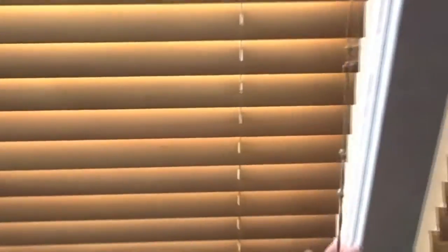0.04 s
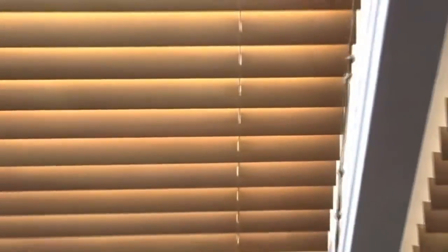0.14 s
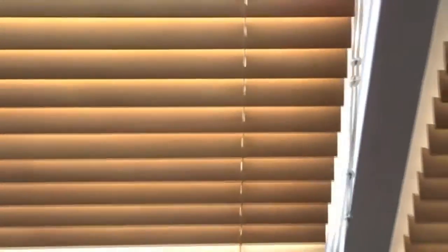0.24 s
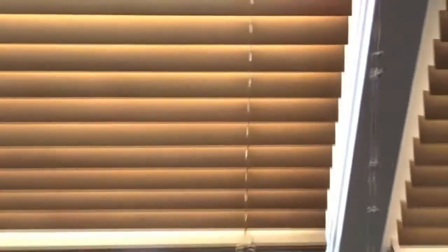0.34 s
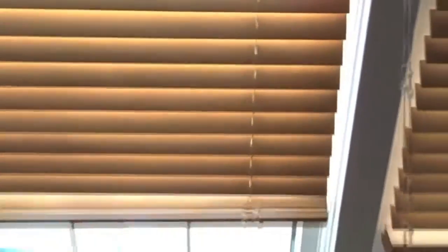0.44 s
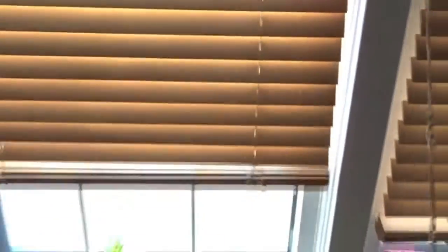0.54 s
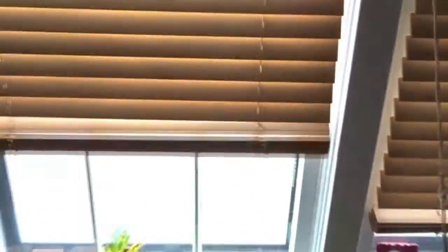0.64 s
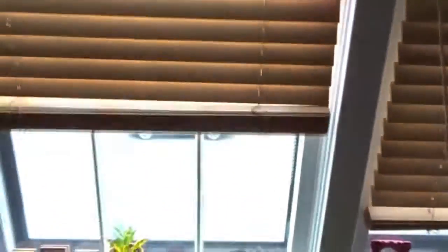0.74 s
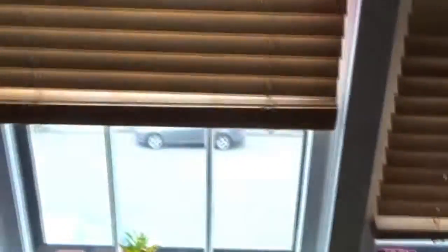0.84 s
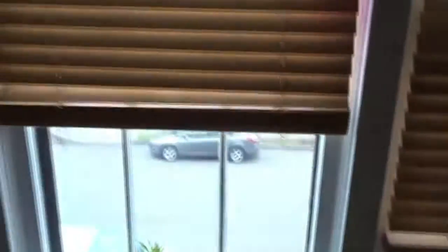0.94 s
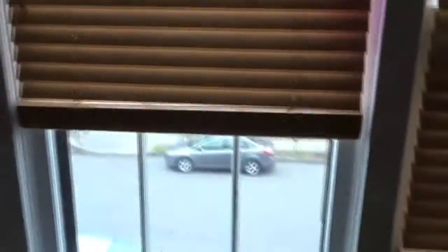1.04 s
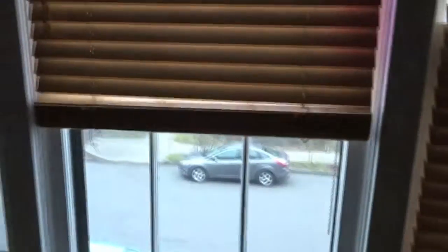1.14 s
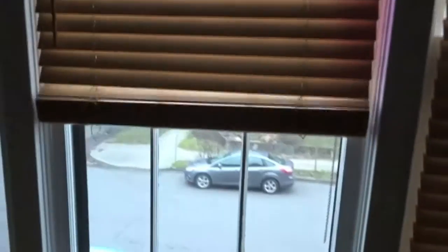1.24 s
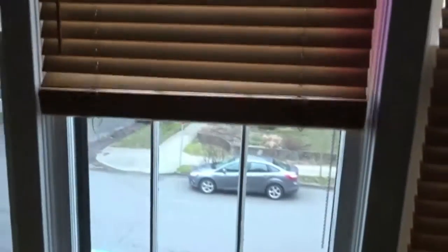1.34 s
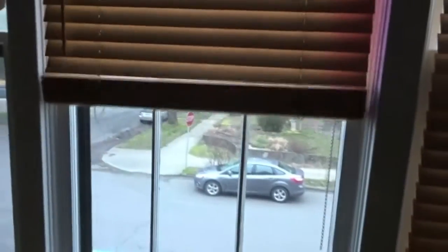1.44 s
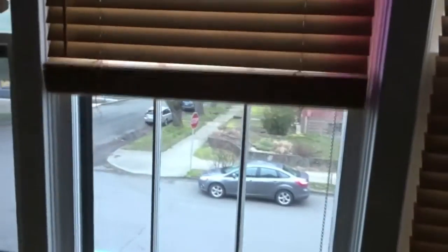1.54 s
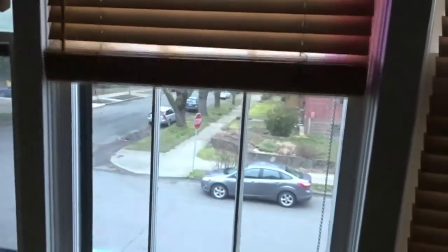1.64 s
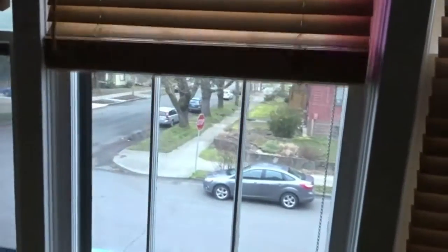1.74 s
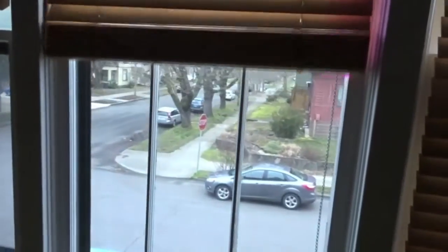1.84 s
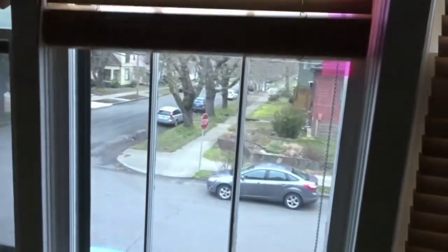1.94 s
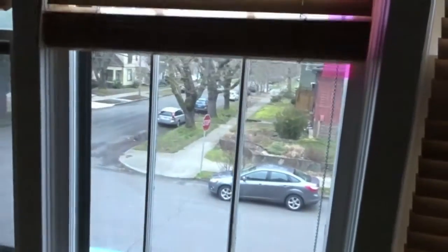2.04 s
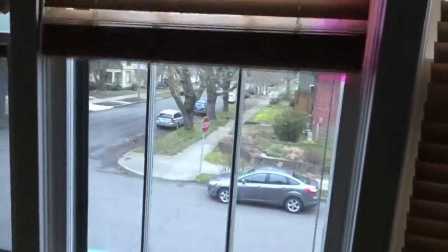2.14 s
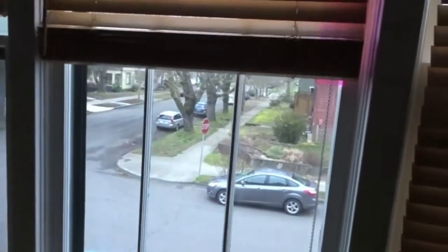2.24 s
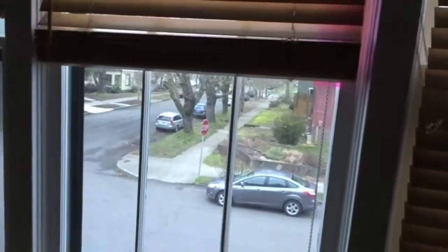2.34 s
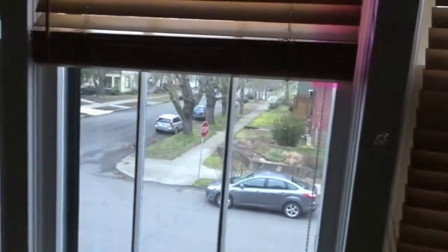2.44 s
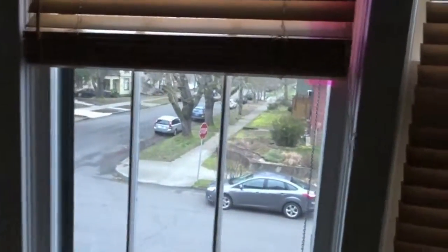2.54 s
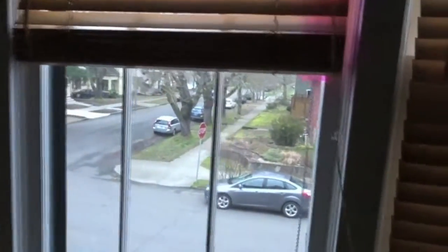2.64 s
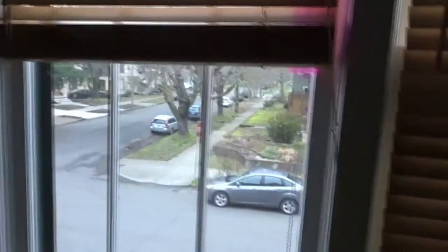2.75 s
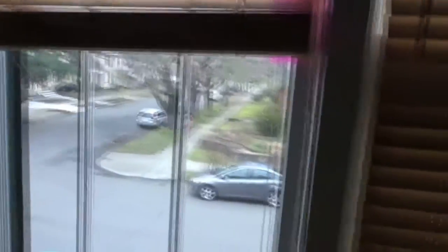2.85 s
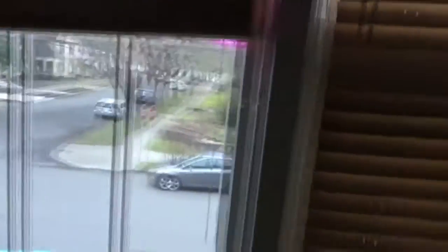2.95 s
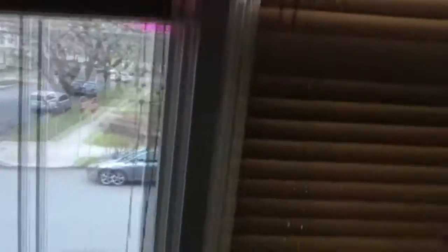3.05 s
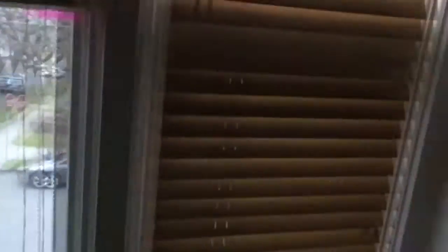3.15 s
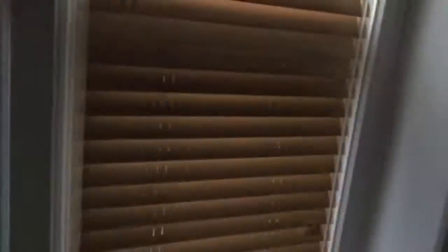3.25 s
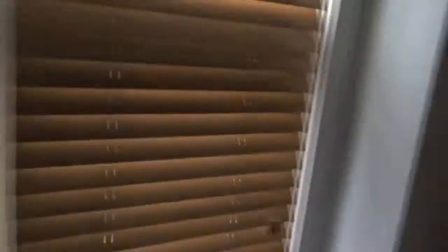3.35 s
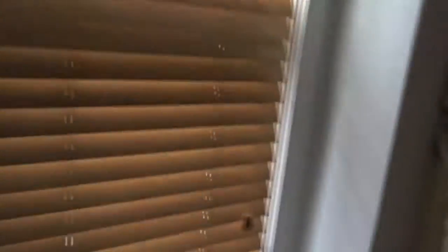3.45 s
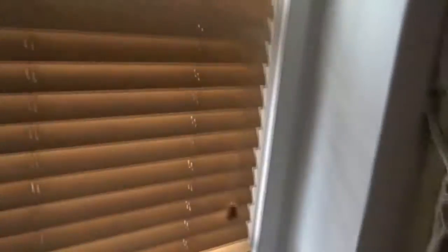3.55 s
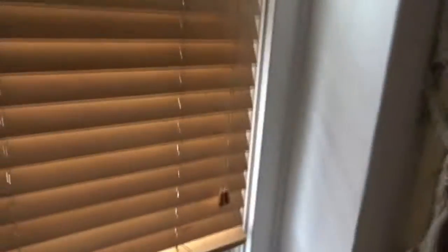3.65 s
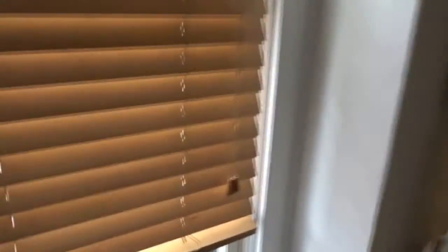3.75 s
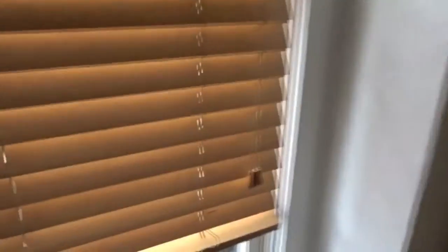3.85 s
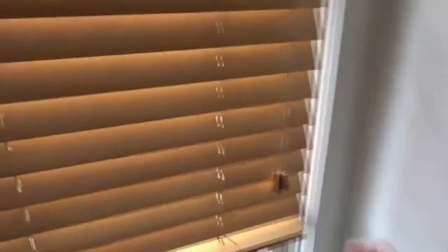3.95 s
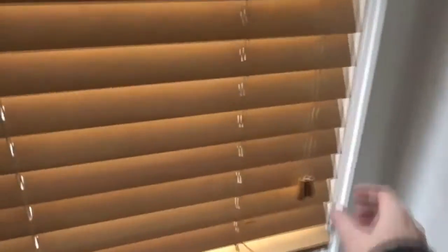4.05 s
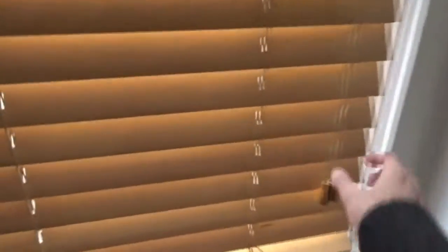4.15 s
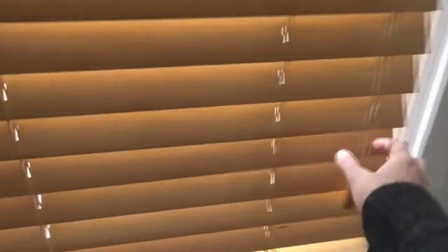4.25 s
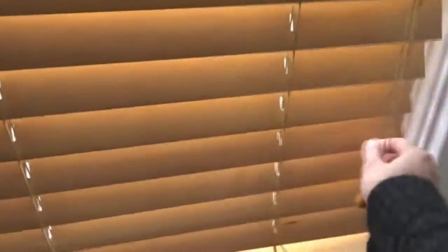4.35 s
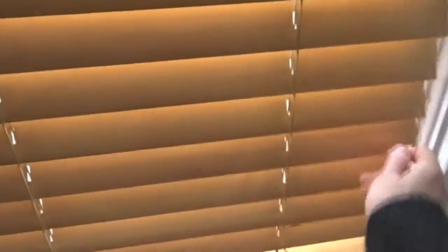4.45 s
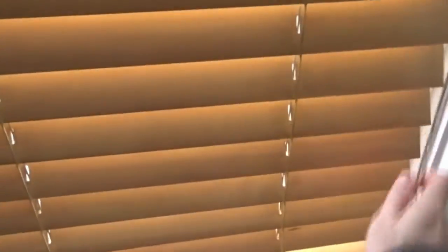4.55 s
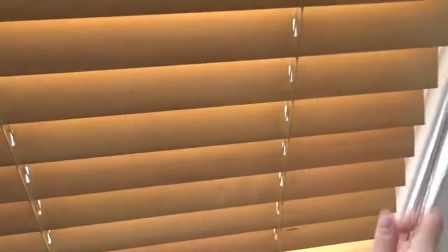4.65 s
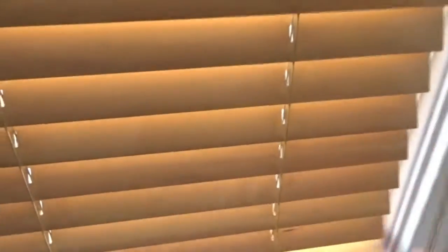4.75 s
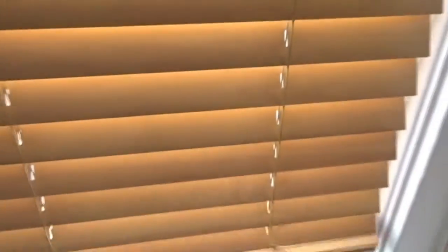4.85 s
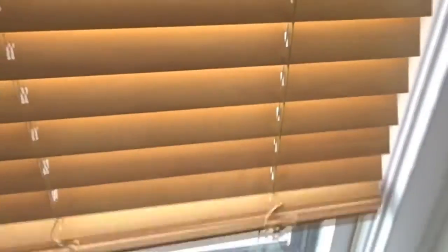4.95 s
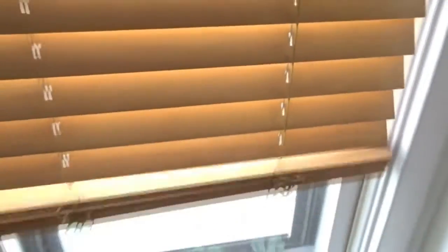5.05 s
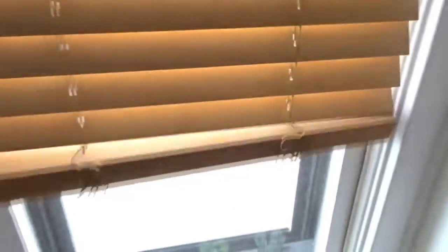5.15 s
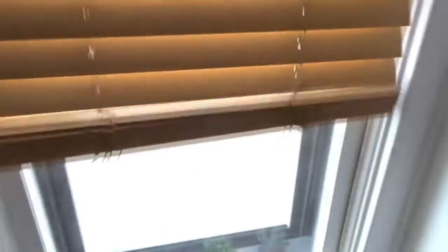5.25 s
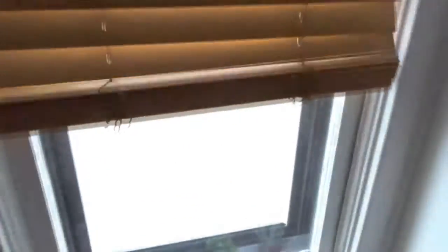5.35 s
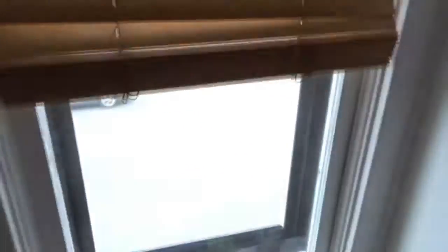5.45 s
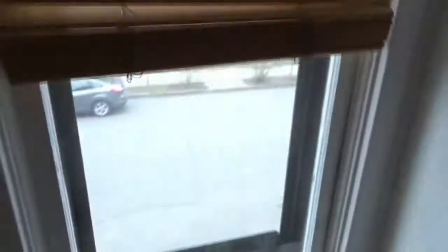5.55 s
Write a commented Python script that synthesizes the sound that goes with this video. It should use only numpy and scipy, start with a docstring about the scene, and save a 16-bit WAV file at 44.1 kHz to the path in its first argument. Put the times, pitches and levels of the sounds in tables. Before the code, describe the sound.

A wooden venetian blind is hauled up in a clattering rush, a cord lock snaps, a hand bumps the frame, and a second blind rattles up.

```python
"""In a bare room, a wooden venetian blind is hauled up: the cord rubs and creaks through the head rail,
while the rising bottom rail gathers slat after slat, each with a clack and a chatter.
Then the raised stack knocks, cords tap, a low hum comes and goes, and the cord lock snaps.
Fingers slide along the next cord, a hand bumps the window frame, tassels click, and a second blind goes up.
Shaped noise makes the rubbing, bursts of tiny impacts the clacks, and fading sine waves the ringing."""
import sys
import numpy as np
from scipy import signal
from scipy.fft import rfft, irfft, next_fast_len
from scipy.io import wavfile
from scipy.ndimage import map_coordinates

SR = 44100
rng = np.random.default_rng(int(sys.argv[2]) if len(sys.argv) > 2 else 0)


def persist_wave(psi):
    """Save psi, clipped to +-1, as 16-bit WAV."""
    counts = np.round(np.clip(psi, -1, 1) * 32767).astype(np.int16)
    wavfile.write(sys.argv[1], SR, np.atleast_2d(counts).T)


N = 246959  # length [samples]
T = np.arange(SR // 2) / SR  # half a second of sample times [s]

# Levels in the tables are relative: the functions that play them may add a gain of their own.
# Two-row signals hold mid (what both ears share) and side (what differs between them).


def amp(db):
    """Decibels to gain."""
    return 10 ** (np.asarray(db) / 20)


def unit(x):
    """Scale to rms 1."""
    return x / np.sqrt(np.mean(x ** 2) + 1e-20)


def blow(x):
    """Scale a hit to rms 1 over its first 10 ms."""
    start = x[..., :SR // 100]
    return x / np.sqrt(np.mean(start ** 2, axis=-1, keepdims=True) + 1e-20)


def noise():
    """Independent white noise for mid and side, as long as the scene."""
    return rng.standard_normal((2, N))


def add(track, s, x):
    """Mix x into the track at time s, cutting off what runs past the end."""
    part = track[:, round(s * SR):][:, :x.shape[-1]]
    part += x[..., :part.shape[1]]


def along(points, hz):
    """Read a (frequency, value) table at any frequency, on a log axis."""
    f, v = np.transpose(points)
    return np.interp(np.log(hz + 1), np.log(f + 1), v)


def effort_gain(rows):
    """Gain at every sample from (time, level) rows, silent outside them."""
    s, db = np.transpose(rows)
    return amp(np.interp(np.arange(N) / SR, s, db, left=-np.inf, right=-np.inf))


def swells(rows, attack, release):
    """Gain of (start, length, level) gestures: each rises, holds, then dies away; times in seconds."""
    t = np.arange(N) / SR
    total = np.zeros(N)
    for s, length, db in rows:
        rise = np.clip((t - s) / attack, 0, 1)
        fall = np.exp(-np.maximum(t - s - length, 0) / release)
        total += amp(db) * rise * fall
    return total


def wobble(rate):
    """A smooth random curve with this many random points a second."""
    knots = rng.standard_normal(int(N * rate / SR) + 4)
    return map_coordinates(knots, [np.arange(N) * rate / SR])


def fade(t60):
    """A decay that loses 60 dB in t60 seconds."""
    return np.exp(-np.log(1000) * T / t60)


def colour(x, spectrum):
    """Filter x to the given spectrum without any sound before its start."""
    m = 2 * next_fast_len(x.shape[-1] // 2 + 2048)
    # folding the cepstrum forward in time makes the filter minimum-phase
    cepstrum = irfft(np.log(amp(along(spectrum, np.fft.rfftfreq(m, 1 / SR)))))
    cepstrum[1:m // 2] *= 2
    cepstrum[m // 2 + 1:] = 0
    return irfft(rfft(x, m) * np.exp(rfft(cepstrum)), m)[..., :x.shape[-1]]


def resonate(x, hz, q):
    """Let through one narrow resonance; a higher q is narrower."""
    return signal.lfilter(*signal.iirpeak(hz, q, fs=SR), x)


def grains(rate, spread_db, t60):
    """A random crowd of tiny contacts, rate a second and uneven in size, rms 1."""
    sizes = amp(spread_db * np.clip(rng.standard_normal(N), -2, 2))
    strikes = (rng.random(N) < rate / SR) * sizes
    energy = np.abs(signal.fftconvolve(strikes ** 2, fade(t60) ** 2)[:N])
    return unit(np.sqrt(energy) * noise())


def crack(t60, scatter_db, scatter_t60):
    """Mid and side of a short contact, with its scatter off slats, glass and frame."""
    decay = fade(t60) + amp(scatter_db) * fade(scatter_t60)
    return rng.standard_normal((2, len(T))) * decay


# how long the room rings: (frequency [Hz], time to fall 60 dB [s])
ROOM_DECAY = [(150, 0.48), (400, 0.53), (1000, 0.62), (3000, 0.51), (7000, 0.49), (15000, 0.41)]


def fade_by_band(hz, t, build):
    """Wall echoes build up, then each frequency dies at its own speed."""
    decay = np.exp(-np.log(1000) * t / along(ROOM_DECAY, hz)[:, None])
    return decay * (1 - np.exp(-t / build))


def reverb(x, build=0.00061):
    """The room's tail: it swells at a pace of build seconds, and its pattern is new every quarter second."""
    out, hop = np.zeros((2, N)), SR // 4
    for start in range(0, N, hop):
        piece = x[:, start:start + hop]
        if np.abs(piece).max() > 1e-5:  # skip silence
            hz, t, z = signal.stft(rng.standard_normal((2, SR // 2)), SR, nperseg=256)
            tail = signal.istft(z * fade_by_band(hz, t, build), SR, nperseg=256)[1]
            tail = tail / np.linalg.norm(tail[0])
            add(out, start / SR, signal.fftconvolve(piece, tail, axes=1))
    return out


def room(x, wet_db):
    """Direct sound plus the room's tail."""
    return x + amp(wet_db) * reverb(x)


# spectrum of the quiet room: (frequency [Hz], level [dB])
ROOM_TONE_COLOUR = [(20, -6), (65, -7.5), (90, -14.5), (138, -2.5), (165, -4.5), (290, -3.5), (360, -0.5),
                    (470, -4.5), (950, -14), (1400, -19.5), (2500, -26), (4500, -30), (13500, -39),
                    (16000, -57)]
ROOM_TONE_DB = -53.5


def room_tone():
    """The nearly steady hush of the room: coloured noise with a very slight wavering of level."""
    level = amp(ROOM_TONE_DB + 0.288 * wobble(32))
    return level * unit(colour(noise(), ROOM_TONE_COLOUR))


# effort of each pull on the cord, one curve a pull: (time [s], level [dB])
PULL_EFFORTS = [
    [(.15, -48), (.3, -31), (.41, -29.5), (.46, -6.5), (.52, -1), (.6, 4), (.72, 3), (.88, -2.5),
     (.97, -8.5), (1.1, -9.5)],
    [(1.1, -12), (1.22, -10.5), (1.6, -12), (1.69, -5), (1.94, -8), (2.04, -36), (2.12, -26.5), (2.22, -18),
     (2.31, -66)],
    [(4.79, -39.5), (4.86, -14.5), (4.9, -9), (5.03, -4), (5.14, -5), (5.3, -6), (5.39, -5.5), (5.44, -6),
     (5.6, -1)],
]
# what each pull stirs at full effort, one row a pull:
# (slat chatter [dB], cord rasp [dB], slat sliding [dB], head rail ringing [dB])
PULL_MIX = [(-33, -36, -33, -40.5), (-30, -35, -27, -35.5), (-33, -32, -28, -57)]
# spectra of chattering slats, rasping cord and sliding slats: (frequency [Hz], level [dB])
CHATTER_COLOUR = [(150, -30), (450, -6.5), (700, -29.5), (1150, -1), (2100, 2), (2650, -4), (2930, 0.5),
                  (3200, -1), (4200, -2.5), (6000, -19), (16000, -23.5)]
CORD_COLOUR = [(1500, -21.5), (3500, 2), (5500, 4.5), (8000, 0), (11000, -1.5), (14000, -7.5),
               (16000, -46.5)]
SLIDE_COLOUR = [(180, -24), (450, -14.5), (620, -5), (880, 1), (1050, -5), (1350, -6.5), (2600, -10.5),
                (8000, -39)]
# resonances of the head rail under the running cord: (frequency [Hz], width [Hz], level [dB])
HEAD_RAIL = [(1700, 100, -7), (2900, 140, 2.5), (5060, 150, -6)]


def pulls():
    """Hanging slats chatter and slide while the cord rasps through holes and pulleys and rings the head rail."""
    mixes = [np.outer(amp(mix), effort_gain(rows)) for rows, mix in zip(PULL_EFFORTS, PULL_MIX)]
    shake, rub, slip, roll = sum(mixes)
    touches = grains(rate=150, spread_db=5, t60=.016)
    fibres = grains(rate=600, spread_db=3.5, t60=.01)
    slips = grains(rate=220, spread_db=3, t60=.035)
    chatter = shake * unit(colour(touches, CHATTER_COLOUR))
    cord = rub * unit(colour(fibres, CORD_COLOUR))
    sliding = slip * unit(colour(slips, SLIDE_COLOUR))
    rail = sum(amp(db) * resonate(fibres, hz, hz / width) for hz, width, db in HEAD_RAIL)
    return chatter + cord + sliding + roll * unit(rail)


# lesser slats jostle: contacts a second, level at full effort, its spread, spread of edge-on lean
JOSTLE_PER_S, JOSTLE_DB, JOSTLE_SPREAD_DB, JOSTLE_EDGE_DB = 26, -36, 2, 3
# their middle flexing pitch, middle clack pitch, and length [s]
JOSTLE_HZ, JOSTLE_RING_HZ, JOSTLE_S = 860, 3000, 0.0057


def jostles():
    """Lesser slat landings at random moments of the pulls, louder where the effort is greater."""
    effort = sum(effort_gain(rows) for rows in PULL_EFFORTS)
    starts = np.flatnonzero((rng.random(N) < JOSTLE_PER_S / SR) & (effort > 0))
    rows = []
    for i, (a, b, c) in zip(starts, rng.standard_normal((len(starts), 3))):
        db = JOSTLE_DB + 20 * np.log10(effort[i]) + JOSTLE_SPREAD_DB * a
        pitch_hz, ring_hz = JOSTLE_HZ * np.exp(0.071 * c), JOSTLE_RING_HZ * np.exp(0.33 * c)
        rows.append((i / SR, db, JOSTLE_EDGE_DB * b, pitch_hz, ring_hz, JOSTLE_S))
    return rows


OWN_COLOUR_DB = 3.5  # how far one slat's resonances stand out from another's


def own_colour(count):
    """Random peaks and dips across the spectrum: no two slats ring alike."""
    heights = OWN_COLOUR_DB * np.clip(rng.standard_normal(count), -2, 2)
    return np.column_stack([np.geomspace(1000, 16000, count), heights])


# spectra of a flexing slat (for a pitch of 800 Hz) and of its clack (for a ring of 3000 Hz):
# (frequency [Hz], level [dB])
FLEX_COLOUR = [(100, -44.5), (200, -21), (380, -15.5), (490, -15), (640, 2), (800, 7), (1080, -4.5),
               (2100, -1), (3000, 1), (4100, -5), (6000, -28.5), (11500, -28), (16000, -43)]
CLACK_COLOUR = [(200, -20.5), (800, 3), (1200, -2.5), (2100, -.5), (2650, 2.5), (3000, 7), (3400, -1),
                (4500, -8), (6500, -13), (16000, -38)]
FLEX_DB, SNAP_DB = -3, -5.5  # flexing and edge snap beside the clack of an even landing
MICRO_IMPACTS_PER_S = 9000
# a corner strikes first, with the energy of this many seconds of the burst that follows
FIRST_TOUCH_S = .0006


def contact(clack_db, edge_db, pitch_hz, ring_hz, length, rise, scatter_db):
    """One wooden contact: a corner ticks, then the edge meets its neighbour in a burst of micro-impacts."""
    flex_db = clack_db + FLEX_DB - edge_db
    snap_db = clack_db + SNAP_DB + edge_db
    t = T[:SR // 8]
    # nearby slats and glass scatter a short tail after the burst
    tail = amp(scatter_db) * fade(9 * length + .02)[:len(t)]
    touch = (1 - np.exp(-t / rise)) * (np.exp(-(t / length) ** 2) + tail)
    moments = unit(rng.random(len(t)) < MICRO_IMPACTS_PER_S / SR)
    impacts = touch * rng.standard_normal((2, len(t))) * moments
    impacts[:, 0] += np.sqrt(FIRST_TOUCH_S * SR) * np.array([1, rng.uniform(-1, 1)])
    hit = colour(impacts, own_colour(count=48))

    # a flat landing flexes the slat; its pitch and its ring depend on where it is struck
    flexing = colour(hit, [(hz * pitch_hz / 800, db) for hz, db in FLEX_COLOUR])
    clack = colour(hit, [(hz * ring_hz / 3000, db) for hz, db in CLACK_COLOUR])
    # the more edge-on the contact, the higher its snap reaches
    top_db = np.clip(-15.5 + 1.4 * (snap_db - clack_db), -20, 0)
    edge = colour(hit, [(5000, 0), (15000, top_db)])

    parts = [(flex_db, flexing, 1.5 * pitch_hz, "low"),
             (clack_db, clack, (1200, 5000), "band"),
             (snap_db, edge, 5000, "high")]
    total = 0
    for db, x, hz, kind in parts:
        band = signal.butter(3, hz, kind, fs=SR, output="sos")
        total = total + amp(db) * blow(signal.sosfilt(band, x))
    return total


# a slat lands on the stack: (time [s], level [dB], edge-on rather than flat [dB],
# flexing pitch [Hz], ring of the clack [Hz], length [s])
SLAT_LANDINGS = [(0.3424, -42.5, -5.5, 774, 2300, 0.021), (0.4691, -26.5, -1, 860, 2670, 0.013),
                 (0.5031, -15.5, -2, 870, 3170, 0.0079), (0.51, -18.5, -5, 850, 3000, 0.0046),
                 (0.536, -28, 0, 850, 3050, 0.0093), (0.5803, -17.5, -2.5, 850, 3000, 0.012),
                 (0.632, -25, -11.5, 766, 2970, 0.0025), (0.6446, -18.5, 7.5, 790, 3200, 0.025),
                 (0.682, -22.5, 6, 790, 3000, 0.017), (0.696, -18, -7.5, 804, 2850, 0.0061),
                 (0.709, -17, -7, 780, 2840, 0.005), (0.716, -25.5, -6, 756, 2900, 0.0036),
                 (0.74, -18, 5.5, 796, 3500, 0.011), (0.761, -22, 5, 770, 2970, 0.005),
                 (0.766, -18, -1, 805, 2500, 0.0025), (0.7793, -16, 4.5, 764, 2440, 0.023),
                 (0.799, -29, -1, 830, 2530, 0.006), (0.822, -15.5, -3.5, 760, 2700, 0.01),
                 (0.8651, -14.5, -2, 743, 3160, 0.013), (0.9924, -21.5, 4, 875, 3180, 0.0071),
                 (1.007, -23.5, -4, 820, 3140, 0.0047), (1.149, -20, 1, 805, 2960, 0.0087),
                 (1.203, -26.5, 2, 990, 2720, 0.017), (1.2551, -26.5, -7, 713, 3200, 0.0073),
                 (1.277, -34.5, 14.5, 645, 2540, 0.01), (1.342, -28.5, 6, 1010, 2810, 0.029),
                 (1.3792, -24.5, -5.5, 820, 4300, 0.014), (1.405, -26.5, 10.5, 960, 2900, 0.0056),
                 (1.4683, -23.5, 4, 950, 2660, 0.02), (1.5115, -20.5, -6.5, 708, 2900, 0.012),
                 (1.591, -28.5, 5.5, 910, 2880, 0.0096), (1.633, -28, 6.5, 900, 3760, 0.0097),
                 (1.653, -27, 8.5, 1010, 2720, 0.0065), (1.6683, -22, -0.5, 785, 3070, 0.0096),
                 (1.685, -31, 9, 910, 2840, 0.004), (1.709, -26, 7.5, 875, 2870, 0.014),
                 (1.7334, -27, -9.5, 910, 2730, 0.008), (1.751, -36, -17, 875, 3590, 0.0092),
                 (1.7647, -13, 0, 860, 3530, 0.0054), (1.792, -25.5, 3, 900, 2950, 0.0044),
                 (1.817, -27.5, 7, 920, 2820, 0.0091), (1.87, -28.5, 2, 770, 3330, 0.008),
                 (1.905, -28.5, -4, 850, 2800, 0.012), (1.926, -36.5, 15.5, 920, 2750, 0.014),
                 (2.1055, -39, -7.5, 985, 3040, 0.0066), (2.23, -55.5, -26.5, 710, 2700, 0.0064),
                 (4.865, -32.5, 6, 810, 4080, 0.008), (4.888, -33.5, 12.5, 935, 2880, 0.017),
                 (4.9219, -24, -5.5, 894, 2900, 0.0026), (4.97, -27.5, -3, 990, 2900, 0.016),
                 (4.9992, -20, 5, 775, 2960, 0.0089), (5.01, -28, -3, 910, 2870, 0.0059),
                 (5.0385, -25, 1, 990, 3570, 0.006), (5.045, -19, -0.5, 970, 3570, 0.0024),
                 (5.104, -41, 7, 900, 3430, 0.0034), (5.1099, -17, -3, 904, 3420, 0.00061),
                 (5.1471, -15.5, 2, 960, 3350, 0.0079), (5.186, -20, 3.5, 960, 3490, 0.0058),
                 (5.231, -22.5, -1, 850, 2800, 0.021), (5.287, -24, 1.5, 840, 2480, 0.0041),
                 (5.3163, -17.5, -2.5, 790, 3230, 0.0054), (5.323, -22.5, 3.5, 786, 2990, 0.0031),
                 (5.3341, -30, -6, 850, 2930, 0.0023), (5.4125, -15.5, -6, 790, 2350, 0.0033),
                 (5.421, -17, 1.5, 730, 3500, 0.017), (5.437, -29, -6, 697, 3350, 0.0062),
                 (5.4512, -19, 1.5, 760, 3300, 0.0043), (5.4892, -17.5, 7, 907, 3400, 0.0035),
                 (5.522, -21.5, 8, 890, 3080, 0.0093), (5.5664, -19, 7.5, 745, 3470, 0.0053),
                 (5.579, -21.5, 6, 700, 3600, 0.0056)]
RISE_SHARE = 0.019  # part of a landing's length that the edge takes to bed in


def slats():
    """The bottom rail picks up slat after slat: a square landing ticks, a slanting one clatters for longer."""
    out = np.zeros((2, N))
    for s, db, edge_db, pitch_hz, ring_hz, length in list(SLAT_LANDINGS) + jostles():
        landing = contact(db, edge_db, pitch_hz, ring_hz, length, RISE_SHARE * length, scatter_db=-7)
        add(out, s, landing)
    return amp(-6.0) * out


# the cord creaks as it takes up load: (time [s], level [dB], pitch [Hz])
CORD_CREAKS = [(0.404, -41.5, 925), (.43, -35, 895), (2.451, -43, 2370), (2.461, -42, 2040),
               (4.264, -60, 1070), (4.662, -41, 845), (4.659, -51.5, 1010), (4.823, -44, 955)]


def creaks():
    """A short rub of the taut cord sings in one narrow slat resonance."""
    out = np.zeros((2, N))
    for s, db, hz in CORD_CREAKS:
        rub = crack(t60=0.036, scatter_db=-32.0, scatter_t60=.15) * (1 - np.exp(-T / 0.0073))
        add(out, s, amp(db - 3) * blow(resonate(rub, hz, 13)))
    return out


# air stirred at the microphone by the swinging arm: (time [s], length [s], level [dB])
ARM_SWINGS = [(.49, 0.19, -50.5), (1.68, 0.27, -58.5), (3.09, 0.14, -53.5), (4.5, 0.061, -50),
              (5.22, 0.056, -51), (5.45, .15, -62)]
# spectrum of the puffs: (frequency [Hz], level [dB])
PUFF_COLOUR = [(15, 2.5), (32, -2), (60, -7), (110, -18.5), (500, -59)]


def draught():
    """The swinging arm sends soft puffs of air to the microphone: swells of very low noise."""
    gusts = swells(ARM_SWINGS, attack=0.041, release=0.074)
    return gusts * unit(colour(noise(), PUFF_COLOUR))


# the loaded pulleys rumble in the head rail: (time [s], length [s], level [dB])
PULLEY_LOADS = [(.5, 0.36, -53), (1.61, 0.073, -42.5), (1.72, 0.24, -46), (4.92, 0.15, -46.5),
                (5.25, 0.46, -48.5)]
# spectrum of the rumble: (frequency [Hz], level [dB])
RUMBLE_COLOUR = [(70, -39), (130, -7.5), (180, -0.5), (260, -4), (450, -4.5), (900, -49), (4000, -59)]


def pulleys():
    """The head rail rumbles under the weight of the blind: a crowd of small low contacts."""
    load = swells(PULLEY_LOADS, attack=0.024, release=0.087)
    turning = grains(rate=340, spread_db=1, t60=0.051)
    return amp(-2.0) * load * unit(colour(turning, RUMBLE_COLOUR))


def blows(rows, spectrum, t60, push_db, scatter_db, wet_db, build):
    """Hard blows: a sharp push and a short crack arrive directly while the impact fills the room evenly."""
    direct, impacts = np.zeros((2, N)), np.zeros((2, N))
    impact = blow(colour(np.array([T == 0, T == 0], float), spectrum))
    push = amp(push_db) * impact * [[1], [0]]  # mid only
    for s, db in rows:
        snap = blow(colour(crack(t60, scatter_db, scatter_t60=0.16), spectrum))
        add(direct, s, amp(db) * (push + snap))
        add(impacts, s, amp(db) * impact)
    return direct + amp(wet_db) * reverb(impacts, build)


RING_FLUTTER_DB, RING_FLUTTER_PER_S = 3, 55  # size of the flutter, and its random points a second


def ringing(rows, modes):
    """Each blow rings the body's modes at new strengths; loose joints make every mode flutter as it dies."""
    out, knots = np.zeros((2, N)), np.arange(0, T[-1], 1 / RING_FLUTTER_PER_S)
    for s, db in rows:
        ring = np.zeros((2, len(T)))
        for hz, level, life in modes:
            flutter, drift = (np.interp(T, knots, k) for k in rng.standard_normal((2, len(knots))))
            strength = amp(level + RING_FLUTTER_DB * np.clip(flutter, -2, 2))
            phase = 2 * np.pi * (hz * T + rng.random((2, 1))) + .5 * drift
            ring += strength * fade(life) * np.sin(phase)
        add(out, s, amp(db) * blow(ring * (1 - np.exp(-T / 0.0019))))
    return out


# the raised stack swings against the frame: (time [s], level [dB])
STACK_KNOCKS = [(2.434, -27.5), (2.4375, -19), (2.457, -36), (3.257, -29.5), (3.268, -34.5)]
# spectrum of a knock: (frequency [Hz], level [dB])
KNOCK_COLOUR = [(100, -24), (200, -3.5), (550, -11), (900, 3), (1400, -6), (1800, -4), (2100, -9.5),
                (2700, -12.5), (4200, -16.5), (7000, -29), (15000, -36)]
# ringing of the stack: (frequency [Hz], level [dB], time to fall 60 dB [s])
STACK_MODES = [(707, -11, 0.4), (873, -6, .26), (935, 3, 0.23), (1010, -1, 0.34), (1163, 0.5, 0.15),
               (1505, 4.5, .12), (1545, -4, 0.18), (1730, -12.5, .24), (2070, 1, 0.17), (3830, -8.5, .18),
               (4450, -14, 0.14), (5260, -12, .12), (5852, -11, 0.084), (6720, -17, 0.091)]


def stack():
    """The gathered slats knock and ring as the first blind comes to rest."""
    knocks = blows(STACK_KNOCKS, KNOCK_COLOUR, t60=0.019, push_db=-9, scatter_db=-13, wet_db=-3, build=0.016)
    return amp(-14) * knocks + amp(-18) * room(ringing(STACK_KNOCKS, STACK_MODES), wet_db=-6.5)


# light taps of cord and tassels: (time [s], level [dB], edge-on rather than flat [dB], length [s])
LIGHT_TAPS = [(2.616, -57, -5, .00065), (2.621, -53, 2.5, 0.012), (3.58, -60, -3, 0.026),
              (3.89, -67, 7, 0.02), (4.2887, -45.5, 1, 0.001), (4.305, -48.5, 0, 0.0018),
              (4.419, -51, 2, 0.0081), (4.524, -44, -1, .007), (4.551, -46.5, 2.5, 0.0063),
              (4.628, -45.5, 10.5, 0.005)]


def taps():
    """Loose cords and tassels touch slats and frame."""
    out = np.zeros((2, N))
    for s, db, edge_db, length in LIGHT_TAPS:
        add(out, s, contact(db, edge_db, 960, 3500, length, rise=length / 6, scatter_db=-26))
    return out


# a low hum from outside comes and goes: (time [s], length [s], level [dB])
HUM_SWELLS = [(2.66, 0.11, -54), (3.43, 0.14, -52), (4.0, 0.12, -60)]
# spectrum of the hum: (frequency [Hz], level [dB])
HUM_COLOUR = [(200, -45), (300, -29), (340, -4.5), (385, -7.5), (430, -32), (700, -58)]


def hum():
    """A narrow low hum swells faintly through the glass."""
    return swells(HUM_SWELLS, attack=0.077, release=0.049) * unit(colour(noise(), HUM_COLOUR))


# the cord lock bites and rebounds: (time [s], level [dB])
LOCK_SNAPS = [(3.0327, -18.5), (3.0394, -14.5), (3.077, -23), (3.108, -26), (3.175, -36)]
# spectrum of a snap: (frequency [Hz], level [dB])
LOCK_COLOUR = [(60, -44), (130, -10), (220, -1), (420, 3), (650, 1.5), (950, 0.5), (1700, 3), (3200, 4.5),
               (5000, -0.5), (7000, -6), (9500, -14), (12500, -14), (16000, -59)]
# ringing of the lock's metal catch: (frequency [Hz], level [dB], time to fall 60 dB [s])
CATCH_MODES = [(813, -3, 0.063), (1150, -1, 0.055), (1656, -2, 0.065), (3070, -9, 0.047), (3400, -4, .05),
               (3880, -14, .06), (5240, -4, .06), (6670, 0, 0.031), (7000, -9, .05), (11700, -6, .02)]


def lock():
    """The lock snaps twice up in the head rail and chatters briefly; its metal rings, and the room rings on."""
    snaps = blows(LOCK_SNAPS, LOCK_COLOUR, t60=.022, push_db=-6, scatter_db=-8, wet_db=0.5, build=0.011)
    return amp(-12) * snaps + amp(-16.0) * room(ringing(LOCK_SNAPS, CATCH_MODES), wet_db=-8)


# fingers slide along the cord: (time [s], length [s], level [dB])
FINGER_SLIDES = [(4.28, 0.014, -47.5), (4.34, 0.075, -51), (4.45, 0.043, -54.5), (4.51, 0.024, -43)]
# spectrum of the rustle: (frequency [Hz], level [dB])
RUSTLE_COLOUR = [(500, 1.5), (1500, 8), (4000, 2), (7000, 0), (10000, -9.5), (15000, -14.5)]


def fingers():
    """The cord rustles finely in the hand."""
    grip = swells(FINGER_SLIDES, attack=0.012, release=0.016)
    fibres = grains(rate=1500, spread_db=3, t60=.015)
    return amp(1.5) * grip * unit(colour(fibres, RUSTLE_COLOUR))


# the hand bumps the frame: (time [s], level [dB])
HAND_BUMPS = [(4.5095, -14.5), (4.517, -27.5)]
# spectrum of a bump: (frequency [Hz], level [dB])
BUMP_COLOUR = [(50, -35), (100, -2), (160, 2.5), (250, 2), (390, 3.5), (520, -6), (700, -7), (870, -0.5),
               (1200, -9), (1400, -15), (1650, -10), (2150, -17.5), (4200, -25), (7000, -32), (14000, -53)]
# ringing of the frame: (frequency [Hz], level [dB], time to fall 60 dB [s])
FRAME_MODES = [(136, -3.5, 0.15), (178, 0.5, 0.18), (264.4, -5, 0.49), (365, 4, 0.15), (381, -9, 0.56),
               (438, -6, 0.23), (643, -8, 0.23), (850, -4, 0.11), (1340, -16, 0.13), (1626, -1, 0.11),
               (1800, -12.5, .22)]


def frame():
    """The window frame thumps under the hand and rings in a few separate, mostly low modes."""
    thump = blows(HAND_BUMPS, BUMP_COLOUR, t60=0.035, push_db=1, scatter_db=3, wet_db=-2, build=0.00091)
    return amp(-12.5) * thump + amp(-11.0) * room(ringing(HAND_BUMPS, FRAME_MODES), wet_db=-11.5)


# the cord's tassels click together in the hand: (time [s], level [dB])
TASSEL_CLINKS = [(4.628, -35)]
# ringing of a tassel: (frequency [Hz], level [dB], time to fall 60 dB [s])
TASSEL_MODES = [(2850, -9, .03), (4220, 2, 0.028), (4440, -2, .03), (5930, 0, 0.026), (6700, 3, .028),
                (7140, 0, 0.032)]


def tassels():
    """Two small wooden tassels meet with a bright, short ring."""
    return ringing(TASSEL_CLINKS, TASSEL_MODES)


# how much of the side signal is kept: (frequency [Hz], level [dB])
STEREO_WIDTH = [(60, -32), (200, -27.5), (600, -24.5), (1200, -17), (2300, -11), (4400, -3.5), (8000, 1),
                (15000, 0)]


def scene():
    """Two close microphone ports share the bass and differ in the treble."""
    clacks = slats() + taps()
    rubbing = pulls() + fingers() + creaks()
    echo = reverb(amp(-7.0) * clacks + amp(-2) * rubbing)
    blinds = clacks + rubbing + echo + pulleys()
    knocks = stack() + lock() + frame() + tassels()
    surroundings = room_tone() + draught() + hum()
    mid, side = blinds + knocks + surroundings
    side = colour(side, STEREO_WIDTH)
    return np.array([mid + side, mid - side])


TOP_HZ = 16300  # middle of the slope that ends the treble


def record(dry):
    """Nothing is kept above the band limit, which slopes off over 600 Hz."""
    m = next_fast_len(N + SR // 2)
    passed = np.clip((TOP_HZ - np.fft.rfftfreq(m, 1 / SR)) / 600 + .5, 0, 1)
    return irfft(rfft(dry, m) * np.sin(np.pi / 2 * passed) ** 2, m)[:, :N]


dry = scene()
out = record(dry)
persist_wave(out)
```